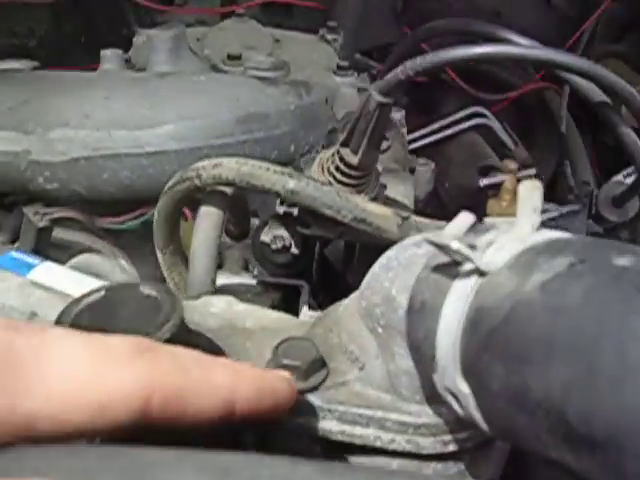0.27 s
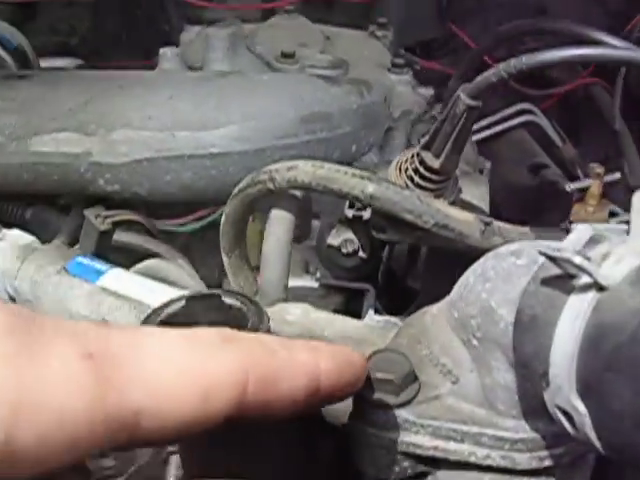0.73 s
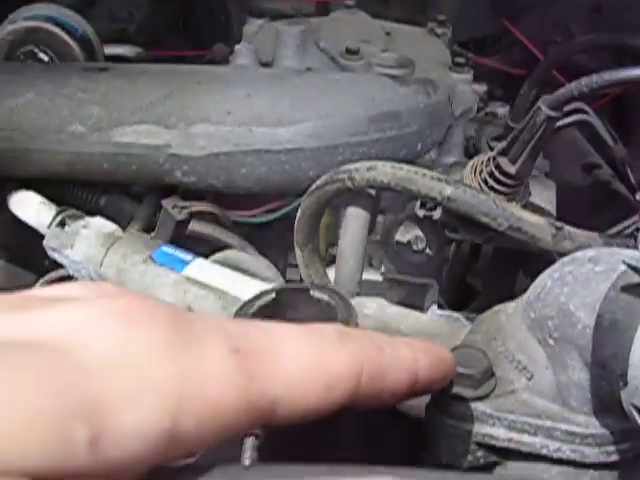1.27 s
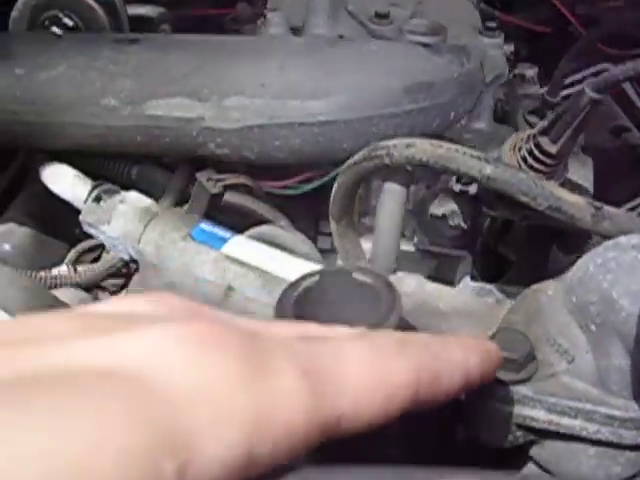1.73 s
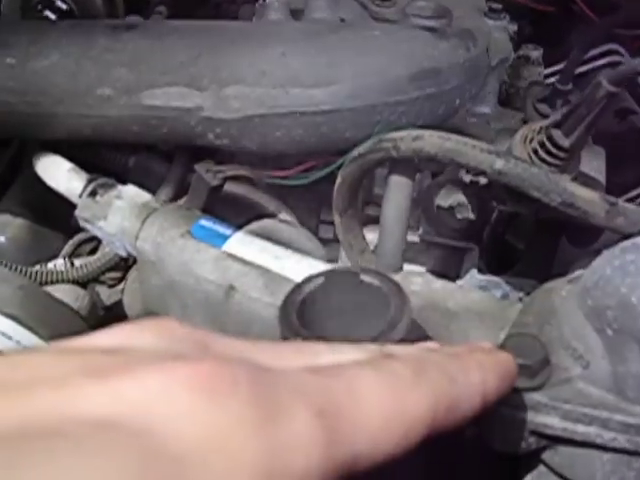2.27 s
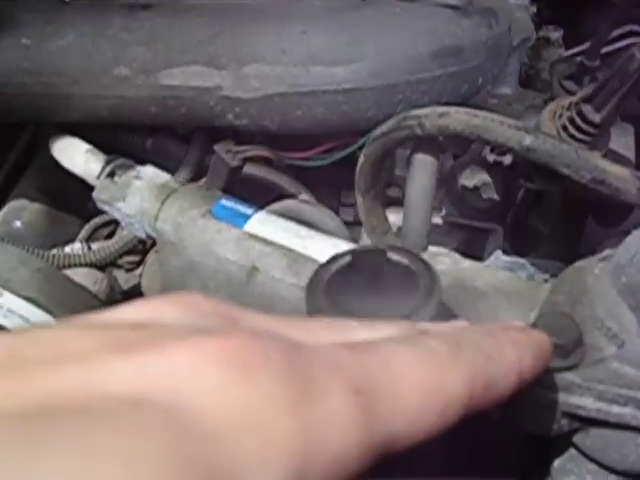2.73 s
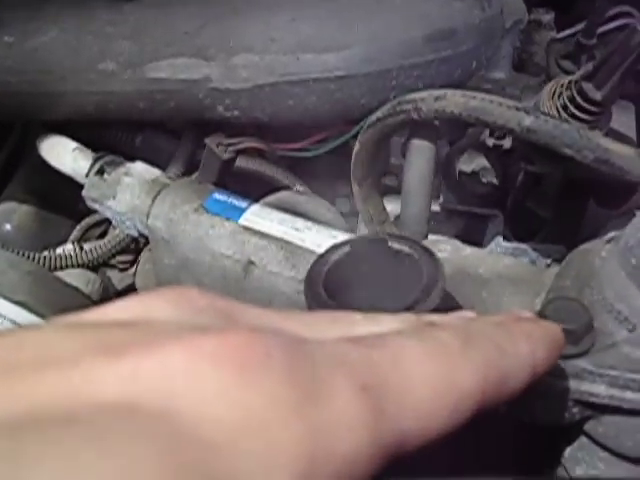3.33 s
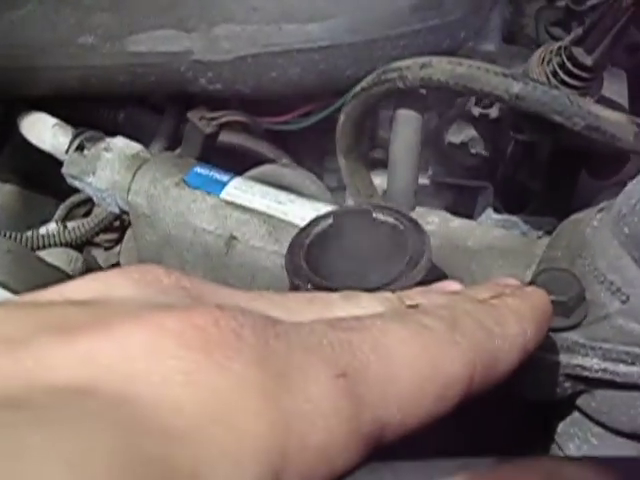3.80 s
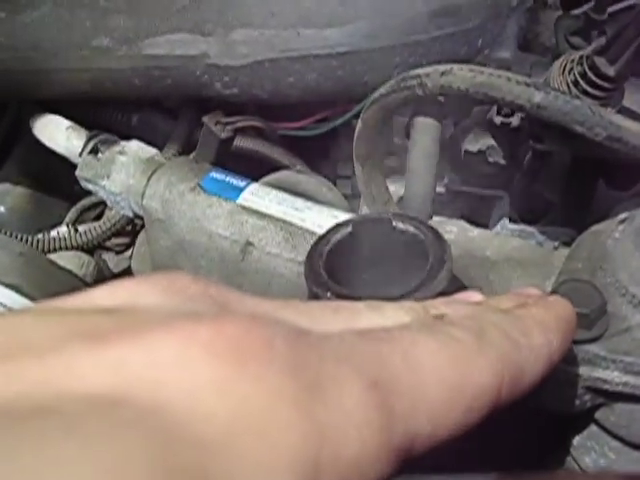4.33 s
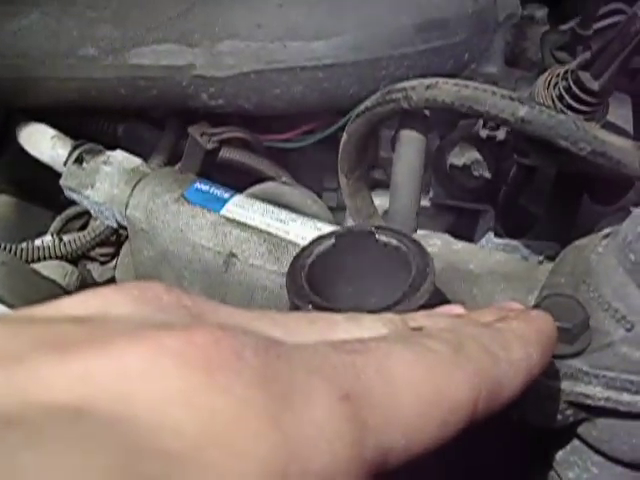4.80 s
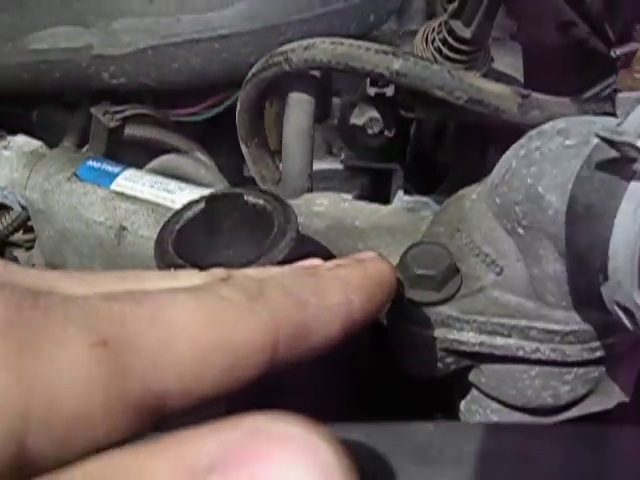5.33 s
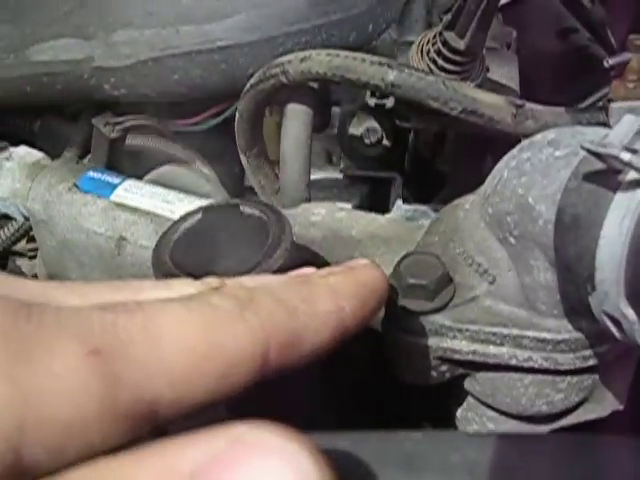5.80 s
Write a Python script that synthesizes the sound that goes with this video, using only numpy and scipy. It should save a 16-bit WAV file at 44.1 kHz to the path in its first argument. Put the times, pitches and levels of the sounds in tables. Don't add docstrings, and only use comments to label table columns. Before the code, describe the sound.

A diesel truck engine idles roughly and steadily up close, hard uneven metallic knocking over valve ticks, exhaust puffs and a fan roar, slightly distorted.

```python
import sys
import numpy as np
from scipy import signal
from scipy.fft import rfft, irfft
from scipy.io import wavfile
from scipy.ndimage import uniform_filter1d, minimum_filter1d

SR = 44100
rng = np.random.default_rng(int(sys.argv[2]) if len(sys.argv) > 2 else 0)


def digitize_waveform(pressure):
    field = np.atleast_2d(pressure).T
    bounded = np.clip(field, -1, 1)
    quanta = np.round(bounded * 32767).astype(np.int16)
    wavfile.write(sys.argv[1], SR, quanta)


def boost(x):
    u = np.asarray(x, float) / 20
    return 10 ** u


N = 267731
CLOCK = np.arange(N) / SR
CYCLES = 34


# (delay [firings], thud [dB], block [dB], knock [dB], knock ring [Hz], cover [dB])
CYLINDERS = [
    (.35, -1, 1.5, -3.5, 2145, 0.5),
    (.42, -5.5, -5, -3, 1960, -2),
    (.38, -6, 0, -1, 2055, 6),
    (.45, -6, -5.5, -6, 2100, 0),
    (.5, -11, -5, -4, 2040, -3.5),
    (0.36, -6, -5.5, -5.5, 2030, -0.5),
    (0.31, -13.5, -19.5, -29.5, 690, -16.5),
    (.35, -5, -4, -6.5, 1815, -10.5),
]


def combustion():
    delay, thud_db, block_db, knock_db, knock_hz, cover_db = np.transpose(CYLINDERS)
    fire = moments(np.arange(8) + delay - .08)
    burn_db = uneven(np.zeros(8), 2.7)
    grit = rng.standard_normal((3, N))
    chance = rng.standard_normal((3, fire.size))
    rattle = bursts(fire, block_db + burn_db, rise_s=.0032, fall_s=.023)
    sump = sump_ring(grit[0], fire, thud_db, burn_db, rattle)
    slap = bursts(fire + .013, uneven(block_db, 4.0) - 9.5, rise_s=.00034, fall_s=.0033)
    block = block_ring(grit[1], fire, block_db, burn_db, rattle, slap)
    cover = cover_ring(grit[2], fire, cover_db, burn_db, rattle, slap)
    bore = bore_knock(chance, fire, knock_db, knock_hz, burn_db)
    low = boost(-4.5) * sump + boost(-1.5) * block
    high = boost(-5.5) * cover + boost(-2.0) * bore
    return boost(near_db(-16.5, share=-.79)) * low + boost(near_db(-19.5, share=.4)) * high


# (frequency [Hz], width [Hz], level [dB])
SUMP_MODES = [(293.4, 66, -8.5), (336.6, 25, -1.5), (509.4, 19.7, 3.5), (636.2, 38, 2.5), (823, 160, -10.5)]


def sump_ring(grit, fire, thud_db, burn_db, rattle):
    thud = bursts(fire, uneven(thud_db, 2.) + burn_db, rise_s=.0008, fall_s=.004)
    return modes(grit * (.39 + .1 * rattle + thud), SUMP_MODES)


# (frequency [Hz], width [Hz], level [dB])
BLOCK_MODES = [(824, 22, -1), (898, 96, 6.5), (1006, 120, -1), (1135, 78, 6.5), (1310, 33, -11.5),
               (1408, 53, 0.5), (1533, 31, 0.5), (1770, 180, -15.5)]
# (time [s], peak level [dB])
THUMPS = [(0.068, -7), (0.125, -7), (0.171, -6), (0.238, -5), (0.379, -8), (0.588, -5), (0.606, -4),
          (0.763, -6), (0.864, -7), (0.955, -7), (1.047, -9), (1.114, -6), (1.483, -4), (1.599, -9),
          (1.833, -9), (1.897, -5), (2.033, -5), (2.263, -7), (2.587, -5), (3.133, -4), (3.319, -6),
          (3.871, -5), (4.608, -5), (4.793, -6), (5.095, -8), (5.163, -6), (5.324, -7), (5.345, -4),
          (5.512, -6), (5.946, -7)]


def block_ring(grit, fire, block_db, burn_db, rattle, slap):
    block_db = uneven(block_db, 3.3) + burn_db
    s, db, _ = harder(fire, block_db, np.array(THUMPS), lift_db=7.5, lead_s=.0011)
    thump = bursts(s, db, rise_s=.0013, fall_s=.0046)
    return modes(grit * (.08 + .1 * rattle + slap + thump), BLOCK_MODES)


# (frequency [Hz], width [Hz], level [dB])
COVER_MODES = [(1926, 33, 4), (2196, 26, 7), (2343, 52, 9.5), (2478, 170, -1), (2570, 110, -27),
               (3100, 250, -42.5), (3280, 200, -21.5)]
# (time [s], peak level [dB], ring [Hz])
KNOCKS = [(0.2414, -8, 2100), (0.406, -9, 1890), (0.6115, -7, 2010), (0.6833, -8, 2020), (1.1682, -8, 2020),
          (1.2805, -8, 1840), (1.4621, -4, 1890), (1.6457, -7, 1810), (1.6716, -8, 2140),
          (1.8312, -9, 1800), (2.0128, -6, 1800), (2.0817, -6, 2040), (2.5234, -9, 2050),
          (2.591, -10, 2150), (2.7008, -6, 2050), (2.819, -7, 2060), (2.9327, -8, 1800), (3.1587, -7, 2010),
          (3.2575, -6, 2050), (3.4426, -5, 2050), (3.6706, -12, 1820), (3.6944, -5, 2140),
          (3.9444, -7, 2000), (4.6129, -7, 2150), (4.7324, -9, 1990), (4.9596, -10, 1800),
          (5.1617, -9, 2150), (5.2834, -7, 2050), (5.7404, -8, 2010), (5.901, -8, 2150)]


def cover_ring(grit, fire, cover_db, burn_db, rattle, slap):
    cover_db = uneven(cover_db, 2.8) + burn_db
    s, db, _ = harder(fire + .0017, cover_db, np.array(KNOCKS), lift_db=10.5, lead_s=.0011)
    shake = bursts(s, db, rise_s=.0028, fall_s=.005)
    return modes(grit * (.015 + .073 * rattle + .5 * slap + shake), COVER_MODES)


def bore_knock(chance, fire, knock_db, knock_hz, burn_db):
    knock_db = uneven(knock_db - 1.5, 1.3) + burn_db
    s, db, near = harder(fire + .003, knock_db, np.array(KNOCKS), lift_db=5, lead_s=.0025)
    hz = np.tile(knock_hz, CYCLES) * (1 + .015 * chance[2])
    hz[near] = np.array(KNOCKS)[:, 2]
    bore = rings(s, db, hz, rise_s=.01, fall_s=.0038, phase=3 * chance[0])
    cross_s = s + .006 + .003 * chance[0]
    cross_db = db - 11 + 2.5 * chance[2]
    cross_hz = hz * (1.03 + .05 * chance[1])
    cross = rings(cross_s, cross_db, cross_hz, rise_s=.0034, fall_s=.004, phase=3 * chance[2])
    return evened(bore + cross)


# (place [firings], level [dB])
TICKS = [
    (1.3, 0.5),
    (1.5, -5),
    (4, -5),
    (2.1, -11),
    (5.5, -5.5),
    (5.3, 1.5),
    (5.9, -8.5),
    (7.6, 3),
    (.1, -7),
]
# (time [s], peak level [dB])
CHATTERS = [(0.6045, -25), (0.9168, -28), (1.039, -28), (1.0984, -32), (1.1363, -28), (1.4691, -32),
            (1.5788, -28), (1.6432, -30), (1.7838, -32), (1.8372, -29), (2.796, -31), (2.9422, -25),
            (3.0325, -29), (3.1193, -28), (3.4436, -30), (3.489, -27), (3.9888, -29), (4.6024, -31),
            (4.7102, -31), (4.9142, -29), (4.9561, -30), (5.2091, -32), (5.438, -27), (5.7593, -28),
            (5.887, -31)]


def valve_gear():
    place, db = np.transpose(TICKS)
    s, db, _ = harder(moments(place), uneven(db - 5.0, 1.4), np.array(CHATTERS), lift_db=33.5, lead_s=.002)
    chatter = rng.standard_normal(N) * (.22 + bursts(s, db, rise_s=.0039, fall_s=.016))
    return boost(near_db(-38.0, share=.2)) * evened(mode(chatter, 3810, 65))


# (place [firings], level [dB], pipe note [Hz])
PUFFS = [(0.17, -8, 240), (1, -8, 330), (2.3, -2.5, 340), (3.4, -6, 320), (4.1, -7, 150), (4.65, 0.5, 235),
         (5.3, -10.5, 100), (5.8, 2.5, 225), (6.4, -7.5, 160), (6.85, -3.5, 240), (7.4, -5, 150)]
# (multiple of the cycle rate [1], level [dB])
HUM = [(8, -57.5), (16, -51.5), (24, -57.5), (32, -46.5)]


def exhaust():
    place, db, hz = np.transpose(PUFFS)
    chance = rng.standard_normal((2, CYCLES, len(hz)))
    puff_hz = hz * (1 + .07 * chance[0])
    boom = rings(moments(place), uneven(db, 2.3), puff_hz, rise_s=.0046, fall_s=.009, phase=.8 * chance[1])
    cycles = np.interp(CLOCK, *np.transpose(CRANK))
    hum = sum(boost(db) * np.sqrt(2) * np.sin(2 * np.pi * k * cycles) for k, db in HUM)
    return boost(-32.5) * evened(boom) + hum


# (frequency [Hz], level [dB per Hz])
ROAR = [(30, -41), (60, -27.5), (72, -24.5), (130, -19), (300, -7), (420, -6), (900, -3), (1700, -7),
        (2100, -8.5), (2500, -11.5), (2960, -17.5), (3800, -22.5)]


def fan():
    air = rng.standard_normal((2, N))
    roar = coloured(air[0], ROAR, left=-60)
    blade = mode(mode(air[1], 80, 5.2), 80, 12)
    return boost(-21.5) * evened(roar) + boost(-47.5) * evened(blade)


# (time [s], position [engine cycles])
CRANK = [(0.0, 0.004), (0.4, 2.169), (0.8, 4.336), (1.2, 6.504), (1.6, 8.683), (2.0, 10.864), (2.4, 13.039),
         (2.8, 15.216), (3.2, 17.406), (3.6, 19.553), (4.0, 21.74), (4.4, 23.909), (4.8, 26.074),
         (5.2, 28.256), (5.6, 30.425), (6.08, 33.019)]


def moments(place, jitter_s=.0014):
    s, cycles = np.transpose(CRANK)
    turn = np.arange(CYCLES)[:, None] + np.asarray(place) / 8
    return np.interp(turn, cycles, s, right=9) + jitter_s * rng.standard_normal(turn.shape)


def uneven(db, spread_db):
    return db + spread_db * np.minimum(rng.standard_normal((CYCLES, len(db))), .8)


def harder(s, db, events, lift_db, lead_s):
    s, db = s.flatten(), db.flatten()
    near = abs(s[:, None] - events[:, 0]).argmin(0)
    s[near] = events[:, 0] - lead_s
    db[near] = events[:, 1] + lift_db
    return s, db, near


def burst_shape(t, rise_s, fall_s):
    return (1 - np.exp(-t / rise_s)) * np.exp(-t / fall_s)


def bursts(s, db, rise_s, fall_s):
    train = np.zeros(N)
    at = (np.ravel(s) * SR).astype(int)
    inside = (at >= 0) & (at < N)
    np.add.at(train, at[inside], boost(np.ravel(db))[inside])
    shape = burst_shape(CLOCK[:4000], rise_s, fall_s)
    return signal.oaconvolve(train, shape / shape.max())[:N]


def rings(s, db, hz, rise_s, fall_s, phase):
    out, t = np.zeros(N + 3000), CLOCK[:3000]
    shape = burst_shape(t, rise_s, fall_s)
    for at, gain, f, p in zip(*map(np.ravel, (s, boost(db), hz, phase))):
        if 0 <= at < CLOCK[-1]:
            out[int(at * SR):][:3000] += gain * shape * np.sin(2 * np.pi * f * t + p)
    return out[:N]


def mode(x, hz, width):
    return signal.lfilter(*signal.iirpeak(hz, hz / width, SR), x)


def modes(x, table):
    return evened(sum(boost(db) * mode(x, hz, width) for hz, width, db in table))


def evened(x):
    return x / np.sqrt(np.mean(x ** 2))


def coloured(x, table, left=None):
    hz, (f, db) = np.fft.rfftfreq(N, 1 / SR), np.transpose(table)
    return irfft(rfft(x) * boost(np.interp(np.log(hz + 1), np.log(f), db, left=left)), N)


# (time [s], lean [dB])
LEAN = [
    (0, -1.3),
    (.8, -0.5),
    (1.65, .4),
    (2.75, 2.5),
    (3.3, 1.3),
    (3.85, 0),
    (5.2, 0.5),
    (6.07, -.1),
]


def near_db(level_db, share):
    return level_db + share * np.interp(CLOCK, *np.transpose(LEAN))


def scene():
    return (combustion() + valve_gear() + exhaust() + fan())[None]


# (frequency [Hz], level [dB])
MIC = [(20, -14), (45, -3.5), (70, 0.5), (2400, 0.5), (2900, -3), (3300, -5.5), (3700, -3), (3900, 0)]


def microphone(x):
    return coloured(x, MIC)


def slow_sampling(x):
    rate_hz = 7850
    band = signal.firwin(401, rate_hz / 2 - 40, window=("kaiser", 8), fs=SR)
    x = signal.oaconvolve(x, band, "same")
    x = x + boost(-2.0) * 2 * x * np.cos(2 * np.pi * rate_hz * CLOCK)
    smoothing = signal.firwin(301, 4080, window=("kaiser", 10), fs=SR)
    return signal.oaconvolve(x, smoothing, "same")


FULL, OFFSET = .712, -.0592


def limited(x, spare):
    room = .94 * FULL - np.sign(x) * OFFSET
    want = np.where(spare, 1, np.minimum(1, room / (abs(x) + 1e-9)))
    held = minimum_filter1d(want, size=161)
    return x * uniform_filter1d(uniform_filter1d(held, size=81), size=81)


# (time [s], splatter level [dB], swing direction [+1 or -1])
OVERLOADS = [(0.1073, -42, 1), (0.2493, -32.5, 1), (0.566, -41.5, -1), (0.6177, -30, 1), (0.7757, -36, -1),
             (0.9333, -33, -1), (0.9627, -41, -1), (1.1162, -34, -1), (1.3085, -42, 1), (1.3584, -30.5, 1),
             (1.4641, -32, 1), (1.4856, -33.5, -1), (1.8987, -27.5, -1), (2.0349, -35.5, -1),
             (2.2237, -41.5, -1), (2.4062, -33.5, -1), (2.4485, -35.5, -1), (2.773, -34.5, -1),
             (2.8247, -26.5, -1), (2.982, -35, -1), (3.0041, -30, -1), (3.6239, -31.5, -1),
             (3.808, -30, -1), (3.8765, -33, -1), (4.4296, -32, -1), (5.098, -18, -1), (5.4532, -33.5, -1),
             (5.5351, -33, -1), (5.7408, -31.5, -1), (6.0259, -34.5, -1)]
GRAZES = [.2428, .3813, .6131, 1.5989, 1.6921, 1.8874, 1.9028, 2.0802, 2.086, 2.428, 2.4588, 2.5204, 2.5276,
          2.588, 2.7045, 2.71, 3.1365, 3.2601, 3.349, 3.6918, 3.7467, 3.8723, 4.0854, 4.2709, 4.6136,
          4.7362, 5.0061, 5.2154, 5.368, 5.9067]


def overloaded(x):
    t, spare = CLOCK[:201] - CLOCK[100], np.zeros(N, bool)
    crest = np.exp(-.5 * (t / .00037) ** 2) * np.cos(2 * np.pi * 1200 * t)
    s, db, side = np.transpose(OVERLOADS + [(s, -46.5, -1) for s in GRAZES])
    places, side = (s * SR).astype(int), np.sign(side)
    peak = side * FULL * (1.03 + boost(.67 * db + 3.7)) - OFFSET
    for _ in range(4):
        x = limited(x, spare)
        for k, at in enumerate(places):
            at += (side[k] * x[at - 8:at + 9]).argmax() - 8
            x[at - 100:at + 101] += crest * (peak[k] - x[at])
            places[k] = at
            spare[at - 7:at + 8] = True
    return x


def bent(x):
    knee, bend_hz = .6, 4600
    bend = np.sign(x) * boost(6) * np.clip(abs(x) - knee, 0, FULL - knee) ** 2
    return x - signal.sosfiltfilt(signal.butter(4, bend_hz, fs=SR, output="sos"), bend)


def band_limit(x):
    return signal.sosfilt(signal.butter(12, 15870, fs=SR, output="sos"), x)


def record(dry):
    x = slow_sampling(microphone(dry[0]))
    x = bent(overloaded(x) + OFFSET)
    return band_limit(np.clip(x, -FULL, FULL)[None])


dry = scene()
out = record(dry)
digitize_waveform(out)
```